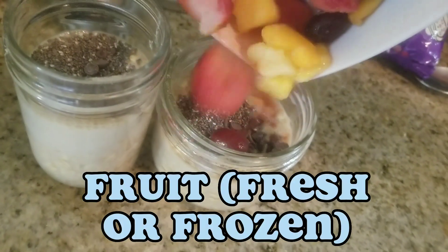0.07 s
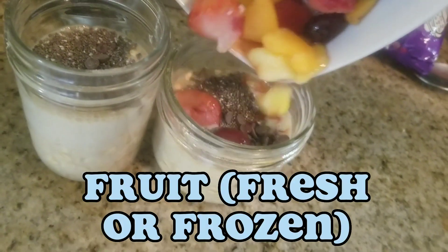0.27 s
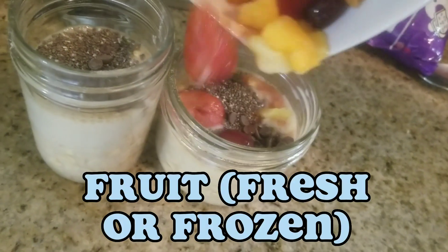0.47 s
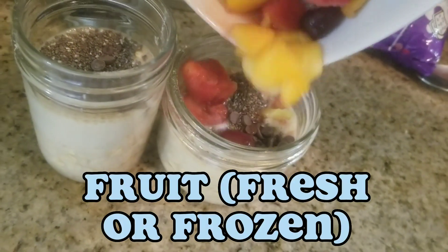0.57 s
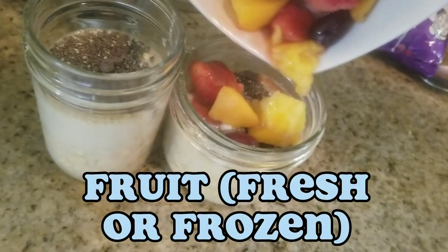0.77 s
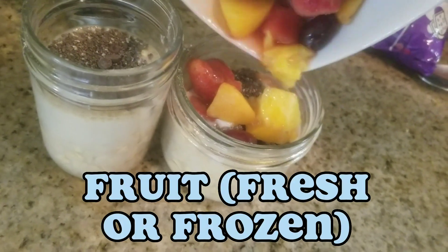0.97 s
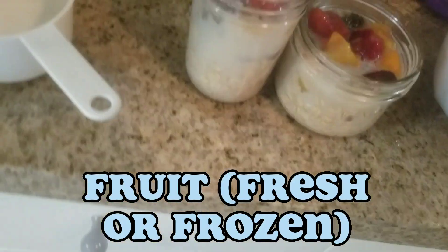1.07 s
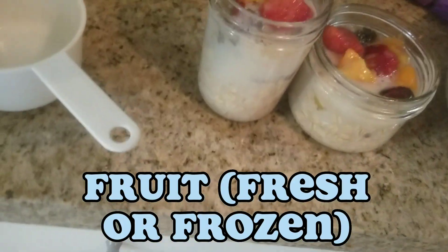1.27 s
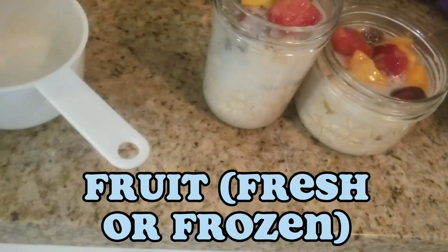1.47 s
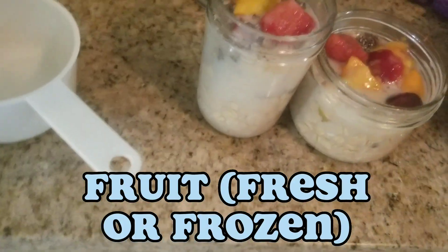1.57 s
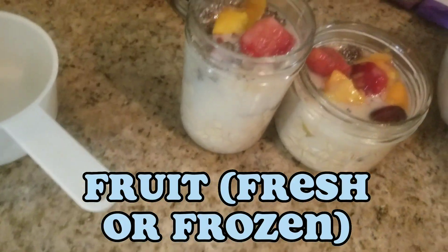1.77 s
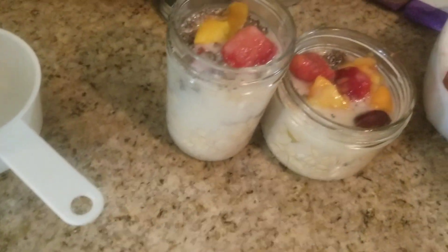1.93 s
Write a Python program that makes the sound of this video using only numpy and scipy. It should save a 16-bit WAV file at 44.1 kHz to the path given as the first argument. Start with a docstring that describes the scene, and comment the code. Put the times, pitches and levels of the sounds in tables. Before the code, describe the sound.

A hard knock of bowl against glass jar rings briefly in a kitchen, followed by faint wet squelches, sticky ticks, a small click, dull bumps and a light glass touch; close stereo microphones, fridge humming.

```python
"""Fruit is tipped from a bowl into a glass jar on a stone counter: one hard knock rings jar, bowl and kitchen.
Wet pieces slide and squelch as coloured grainy noise, juice films tick in narrow or wide bands of noise.
Late on, decaying sines make dull bumps and a light touch of glass; a small dry click is louder in the left.
A fridge hums behind on wavering harmonics over a noise floor. The right microphone hears the treble of the
small wet and glassy sounds; the left one is muffled."""
import sys
import numpy as np
from scipy import signal
from scipy.fft import rfft, irfft
from scipy.io import wavfile
from scipy.ndimage import uniform_filter1d

SR = 44100
rng = np.random.default_rng(int(sys.argv[2]) if len(sys.argv) > 2 else 0)


def generate_wav(signal):
    """Clip the signal to [-1, 1] and save it as 16-bit WAV at the path in sys.argv[1]."""
    frames = np.transpose(np.atleast_2d(signal))
    scaled = np.clip(frames, -1, 1) * 32767
    pcm = np.round(scaled).astype(np.int16)
    wavfile.write(sys.argv[1], SR, pcm)


N = 88200  # two seconds

# treble colour of the small wet sounds as the microphone hears them, with its notch near 8.6 kHz:
# (frequency [Hz], relative gain [dB])
SMALL_SOUND_COLOUR = [(200, -59.5), (1000, -27), (2600, -22), (4000, -9), (6200, 5), (8600, -10.5),
                      (11500, 9), (15500, 0)]


def undb(db):
    """Amplitude factor of a level in dB."""
    return 10 ** (np.asarray(db) / 20)


def clock(start=0):
    """Seconds since start."""
    return np.arange(N) / SR - start


def fade(t, t60):
    """Exponential decay from t = 0, down 60 dB after t60 seconds."""
    return (t >= 0) * np.exp(-np.log(1000) * np.maximum(t, 0) / max(t60, 1e-4))


def unit(x):
    """Scale each channel to energy 1."""
    return x / np.sqrt(np.sum(x ** 2, axis=-1, keepdims=True))


def freqs():
    """Frequencies of the spectrum in Hz, at least 1."""
    return np.maximum(np.arange(N // 2 + 1) * SR / N, 1)


def curve(points, axis=1):
    """Gain in dB at every frequency from one column of a table, straight over log frequency."""
    p = np.array(points, float)
    return np.interp(np.log(freqs()), np.log(p[:, 0]), p[:, axis])


def colour(x, db):
    """Filter with the given gains; folding the cepstrum makes it causal (minimum phase)."""
    cepstrum = irfft(db * np.log(10) / 20, N)
    cepstrum[1:N // 2] *= 2
    cepstrum[N // 2 + 1:] = 0
    return irfft(rfft(x) * np.exp(rfft(cepstrum)), N)


def pair():
    """White noise of rms near 1 at the two microphones, alike in the bass and independent in the treble."""
    half_alike_hz = 600  # the correlation between the microphones is one half here
    mid, side = rfft(rng.standard_normal((2, N)))
    alike = 1 / (1 + (freqs() / half_alike_hz) ** 2)
    common = mid * np.sqrt((1 + alike) / 2)
    opposed = side * np.sqrt((1 - alike) / 2)
    return irfft(common + np.array([[1], [-1]]) * opposed, N)


def walk(rate):
    """Smooth random line with about rate new values per second and a spread near 1."""
    k = max(int(SR / rate), 2)
    steps = np.repeat(rng.standard_normal(N // k + 1), k)[:N]
    return uniform_filter1d(steps, k)


def ring(t, hz, t60):
    """One mode: a decaying sine that starts at t = 0."""
    return fade(t, t60) * np.sin(2 * np.pi * hz * t)


def fridge():
    """Wavering compressor hum over the background noise floor; both reach the left microphone later."""
    # hum harmonics: (multiple of the fundamental, level at the left [dB rms])
    harmonics = [(1, -56.5), (2, -63), (3, -61), (4, -65), (5, -54), (6, -63.5), (7, -61)]
    # background noise floor at each microphone:
    # (frequency [Hz], left density [dB per Hz], right density [dB per Hz])
    noise_floor = [(20, -93, -100), (39.7, -73, -82.5), (62, -73, -70.5), (95, -79.5, -83.5),
                   (150, -84, -81.5), (270, -71.5, -76.5), (400, -80, -81.5), (520, -86.5, -93),
                   (699, -89.5, -102), (1070, -108, -107), (1281, -101, -105), (1529, -88.5, -104),
                   (1950, -108, -112), (3000, -117, -117), (4100, -116, -114), (6300, -124, -108),
                   (8700, -130, -119), (11800, -117, -107), (14920, -110, -112)]
    fundamental_hz, right_db, waver_db, left_lag_s = 59.16, -3, 0.5, 0.00049
    hum = 0
    for multiple, db in harmonics:
        level = undb(db + waver_db * walk(2.4)) * np.sqrt(2)  # rms to peak
        cycles = multiple * fundamental_hz * clock() + rng.random()
        hum = hum + level * np.sin(2 * np.pi * cycles + .3 * walk(6))
    noise = pair() * np.sqrt(SR / 2)  # power 1 per Hz
    left = colour(noise[0], curve(noise_floor, axis=1)) + hum
    right = colour(noise[1], curve(noise_floor, axis=2)) + hum * undb(right_db)
    return np.array([np.roll(left, int(left_lag_s * SR)), right])


def crackle(grain_db, tilt_db=0):
    """Dense tiny bursts of juice, rms 1; tilt is in dB per octave above 2 kHz."""
    swell = np.minimum(walk(1100), 1.8)  # limits the strongest grains
    grains = rng.standard_normal(N) * undb(grain_db * swell)
    octaves_up = np.log2(np.maximum(freqs() / 2000, 1))
    return unit(colour(grains, curve(SMALL_SOUND_COLOUR) + tilt_db * octaves_up)) * np.sqrt(N)


def fruit():
    """Wet pieces slide and squelch, each a held and fading crackle, over a faint fizz."""
    # faint fizz of shifting fruit: (time [s], level [dB])
    fizz_levels = [(0, -63), (.2, -69), (.55, -74), (.68, -62.5), (0.851, -94), (1.02, -74), (1.119, -61.5),
                   (1.38, -69.5), (1.5, -77), (1.68, -68.5), (1.85, -109.5), (2, -88)]
    # wet slides: (time [s], level [dB], hold [s], t60 [s], treble tilt [dB per octave])
    squelches = [(0.069, -40.5, .018, 0.13, -1.5), (0.468, -51.5, 0.0044, .07, -1.5),
                 (0.6044, -45, 0.0063, 0.032, -6.5), (0.767, -62.5, 0.033, 0.091, 0),
                 (1.098, -46, 0.01, 0.078, -3.5), (1.121, -47.5, .006, 0.13, 2.5),
                 (1.2, -54.5, 0.0035, .06, -2)]
    attack_s, grain_db = 0.0015, 5.5
    out = crackle(grain_db) * undb(np.interp(clock(), *np.array(fizz_levels).T))
    for s, db, hold, t60, tilt in squelches:
        t = clock(s)
        envelope = np.clip(t / attack_s, 0, 1) * fade(np.maximum(t - hold, 0), t60)
        out = out + undb(db) * envelope * crackle(grain_db, tilt)
    return out


def ticks():
    """Films of juice and sticky fruit snap: short noise bursts, each in its own band."""
    # snaps: (time [s], level [dB rms over 1 ms], band centre [Hz], half width [octaves])
    snaps = [(0.0215, -56, 6200, 0.23), (0.0569, -54, 6300, 0.2), (0.1086, -44.5, 6200, .5),
             (0.195, -54, 10000, 0.58), (0.3604, -42, 8500, 0.71), (0.607, -42, 4730, 0.28),
             (0.688, -56, 11500, 0.46), (0.7881, -57, 11800, 0.26), (0.8887, -43, 6170, 0.41),
             (0.925, -59, 5750, .5), (1.0201, -49, 5900, 0.31), (1.1325, -43, 12100, 0.41),
             (1.1623, -54, 5000, 0.51), (1.187, -51, 5600, 0.45), (1.2067, -48, 11800, 0.71),
             (1.2107, -45.5, 6300, 0.06), (1.27, -56.5, 5530, .4), (1.4023, -48.5, 11000, .7),
             (1.451, -59, 11500, 0.57), (1.6732, -45, 10430, .9)]
    t60_s = 0.0037
    out = 0
    for s, db, hz, octaves in snaps:
        band = -10 * np.log10(1 + (np.log2(freqs() / hz) / octaves) ** 4)
        burst = rng.standard_normal(N) * fade(clock(s), t60_s)
        snap = colour(burst, band + curve(SMALL_SOUND_COLOUR))
        out = out + undb(db) * unit(snap) * np.sqrt(SR / 1000)  # energy of 1 ms at rms 1
    return out


def knock():
    """A chattering hard contact cracks as coloured noise and sets the modes ringing."""
    # contacts of the knock: (time after the first [s], relative level [dB])
    contacts = [(0, -3), (0.0016, -1), (0.0027, -4)]
    # modes of jar, bowl and counter: (frequency [Hz], left level [dB], right level [dB], t60 [s])
    modes = [(69, -45, -49.5, 0.44), (132.2, -35.5, -35.5, 0.28), (169.5, -29, -30.5, 0.22),
             (229.1, -22, -24.5, 0.19), (430, -18, -19.5, 0.072), (570, -21.5, -22.5, .05),
             (649, -19, -22.5, 0.084), (728, -7.5, -19.5, 0.023), (930, -22.5, -25, 0.0099),
             (1134, -26, -21.5, 0.07), (1889, -23.5, -27.5, 0.032), (2106, -15.5, -22.5, 0.026),
             (3201, -28.5, -12.5, 0.051), (3247, -37, -16, .05), (3873, -54, -26.5, 0.035),
             (4654, -55, -32, .04), (4996, -56.5, -18, 0.047), (5907, -67, -14.5, 0.014),
             (11420, -62.5, -33.5, 0.045)]
    # crack of the contact: (frequency [Hz], left gain [dB], right gain [dB])
    crack = [(40.4, -12.5, -20), (136.2, 6.5, 1.5), (500, 16, 19), (851, 19, 19), (1520, 20.5, 10.5),
             (2270, 12, 17), (3300, 0, 7), (4130, -27.5, 2), (6540, -27.5, 12.5), (7930, -38.5, -1.5),
             (8720, -42.5, -21), (11500, -39, -3), (15500, -33.5, -21.5)]
    start_s, crack_t60_s, build_s = 0.2412, 0.0095, 0.001
    t = clock(start_s)
    build = 1 - np.exp(-np.maximum(t, 0) / build_s)
    ringing = sum(undb([[left], [right]]) * ring(t, hz, t60) for hz, left, right, t60 in modes)
    chatter = sum(undb(db) * fade(t - s, crack_t60_s) for s, db in contacts)
    burst = unit(pair() * chatter)
    left_crack = colour(burst[0], curve(crack, axis=1))
    right_crack = colour(burst[1], curve(crack, axis=2))
    return build * ringing + np.array([left_crack, right_crack])


def click():
    """A small dry click of the recorder, louder in the left channel: a coloured single-sample pulse."""
    # colour of the click: (frequency [Hz], relative gain [dB])
    click_colour = [(200, -2), (700, 15), (2000, 0), (5000, -5), (15000, -16)]
    start_s, level_db, right_db = 1.056, -35, -6  # right_db is relative to the left
    pulse = 1. * (np.arange(N) == int(start_s * SR))
    return colour(pulse, curve(click_colour)) * undb(level_db) * undb([[0], [right_db]])


def bumps():
    """Soft dull bumps through the counter, one decaying sine each, the same at both microphones."""
    # bumps: (time [s], frequency [Hz], level [dB], t60 [s])
    thuds = [(1.292, 60.9, -38.5, 0.31), (1.568, 150, -38.5, 0.075)]
    return sum(undb(db) * ring(clock(s), hz, t60) for s, hz, db, t60 in thuds)


def clink():
    """Glass touched lightly rings in a few high modes."""
    # modes of the glass: (frequency [Hz], level [dB], t60 [s])
    modes = [(3675, -54.5, .105), (5044, -54, .1), (6288, -51.5, .09), (7628, -57.5, .13),
             (10510, -53, .085)]
    start_s, attack_s = 1.5655, 0.00074
    t = clock(start_s)
    ringing = sum(undb(db) * ring(t, hz, t60) for hz, db, t60 in modes)
    return np.clip(t / attack_s, 0, 1) * ringing


def at_microphones(small):
    """The right microphone hears the small sounds in full; the left one hears them muffled."""
    # gain of the small sounds at the left microphone: (frequency [Hz], gain [dB])
    left_shade = [(2000, -4), (4000, -20.5), (7000, -44), (10000, -35), (14000, -9.5)]
    return np.array([colour(small, curve(left_shade)), small])


def kitchen(x):
    """Early echoes from counter and cupboards, then the tail of the room, both as fading noise."""
    # reverberation against the direct sound: (frequency [Hz], gain [dB])
    room = [(100, -3), (250, -10.5), (700, -9.5), (1300, -6.5), (3000, -4), (6000, -11.5), (12000, -9.5)]
    tail_t60_s, early_t60_s, early_db, delay_s = 0.47, 0.095, 0.5, .007  # early_db is relative to the tail
    t = clock(delay_s)
    decay = fade(t, tail_t60_s) + undb(early_db) * fade(t, early_t60_s)
    echo = colour(unit(pair() * decay), curve(room))
    return x + signal.fftconvolve(x, echo, axes=1)[:, :N]


def scene():
    """Knock and small sounds ring in the kitchen; click, bumps and fridge are added without it."""
    small = fruit() + ticks() + clink()
    return kitchen(knock() + at_microphones(small)) + click() + bumps() + fridge()


def record(dry):
    """The recorder cuts the top with a steep low-pass."""
    top_hz = 15600
    low_pass = signal.ellip(8, .2, 70, top_hz, fs=SR, output="sos")  # 0.2 dB ripple, 70 dB rejection
    return signal.sosfilt(low_pass, dry)


dry = scene()
out = record(dry)
generate_wav(out)
```